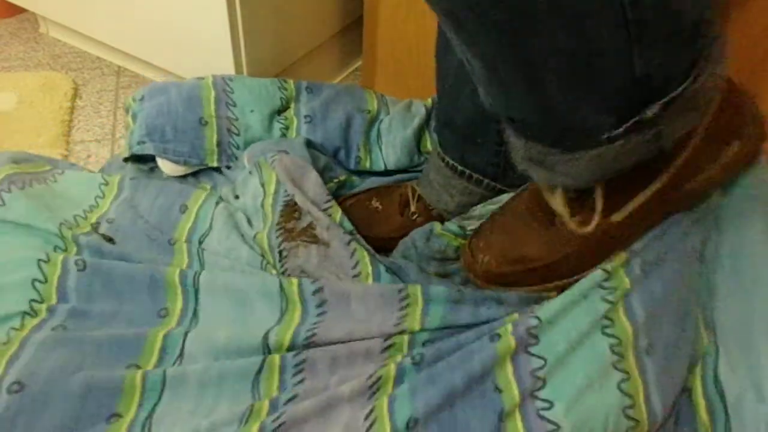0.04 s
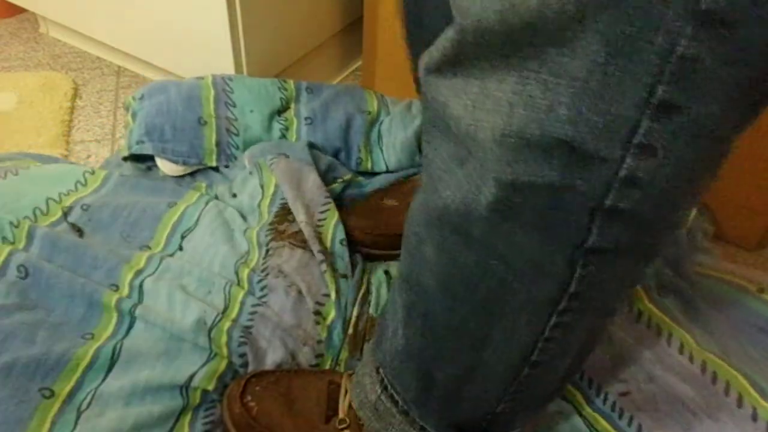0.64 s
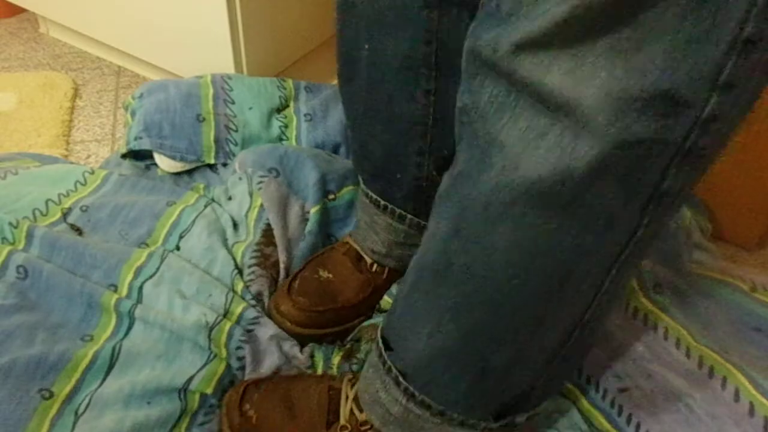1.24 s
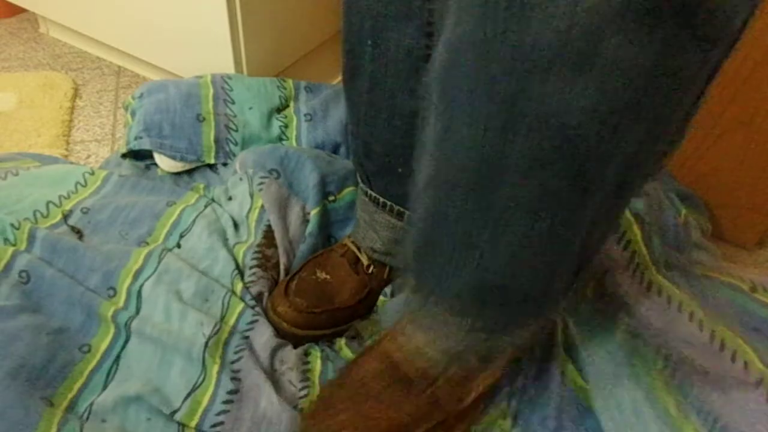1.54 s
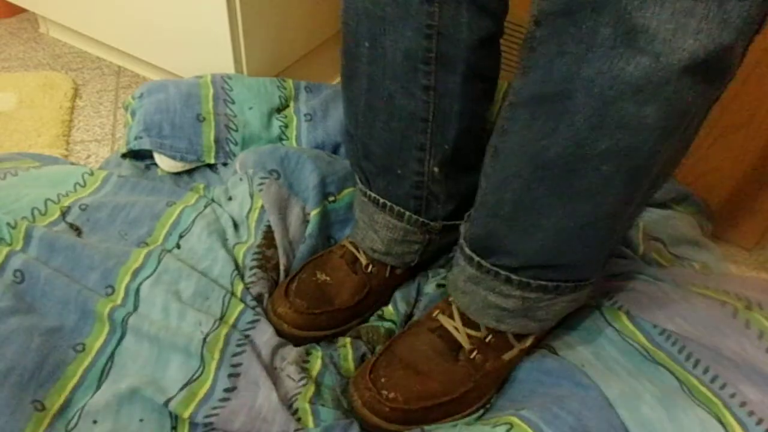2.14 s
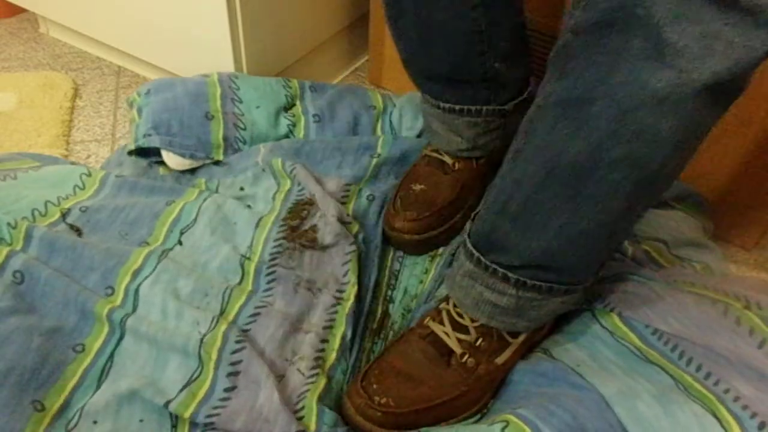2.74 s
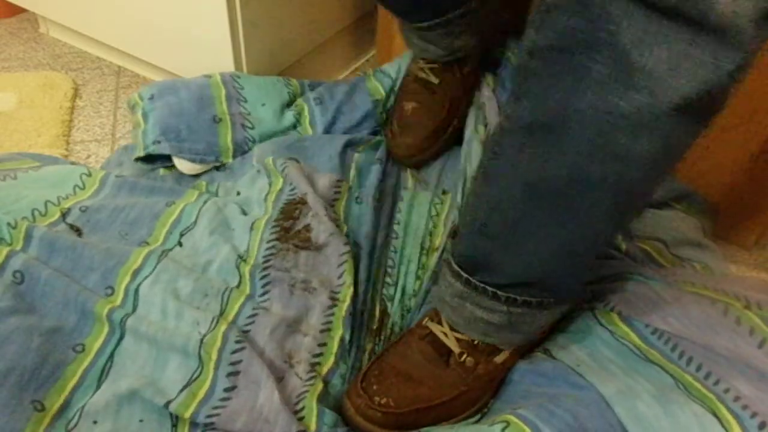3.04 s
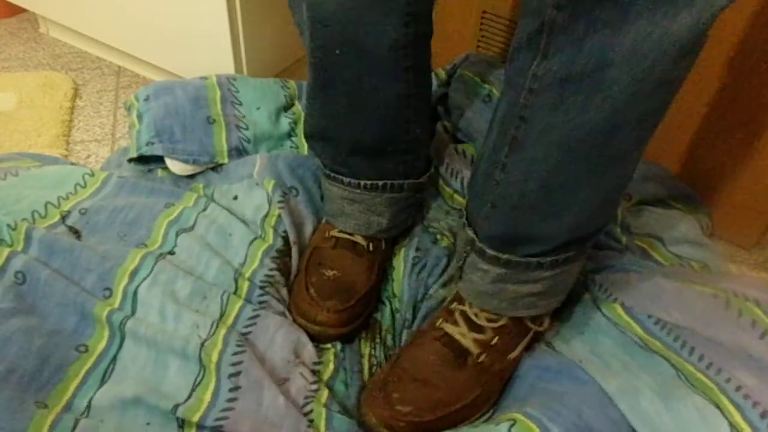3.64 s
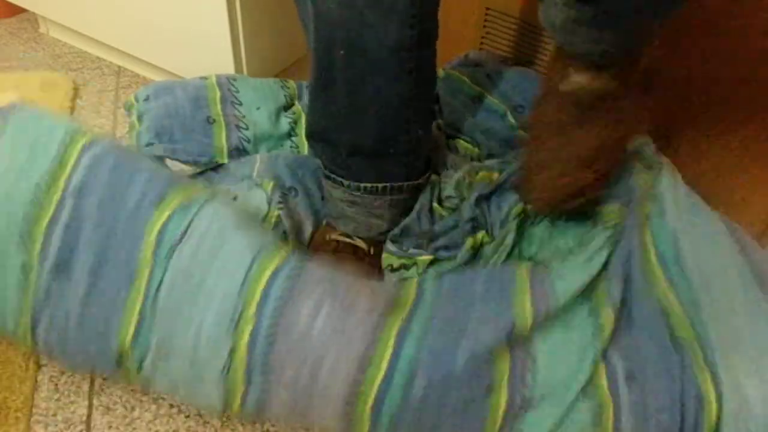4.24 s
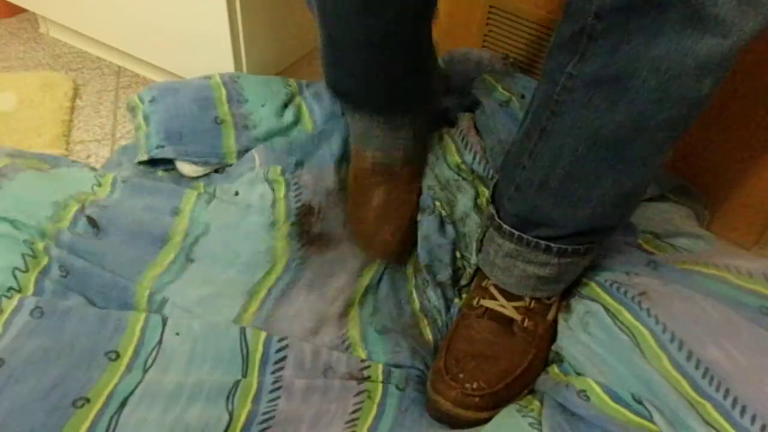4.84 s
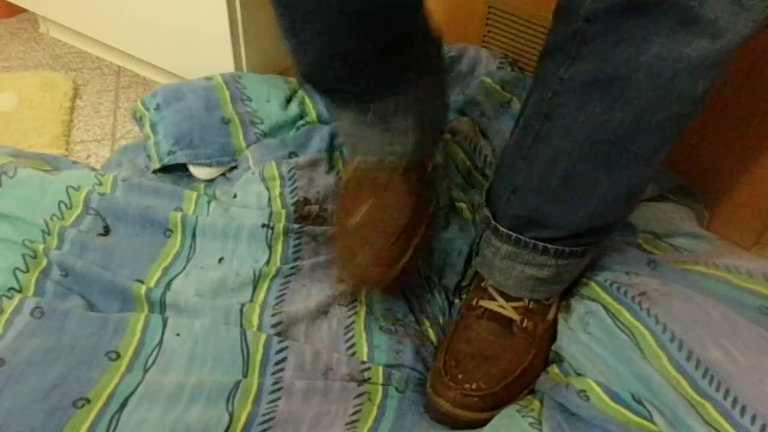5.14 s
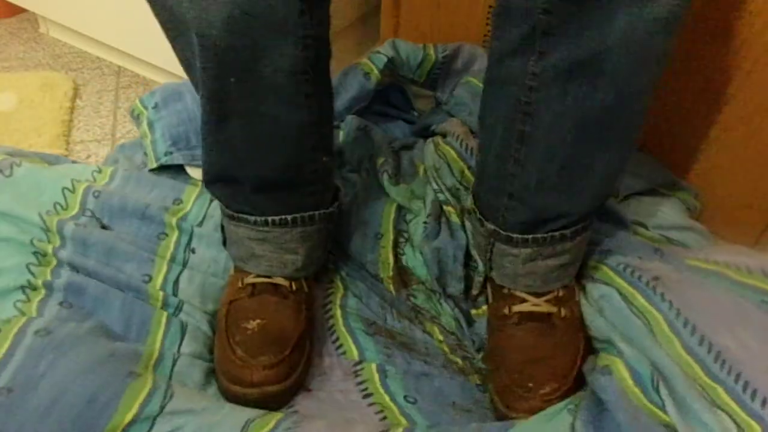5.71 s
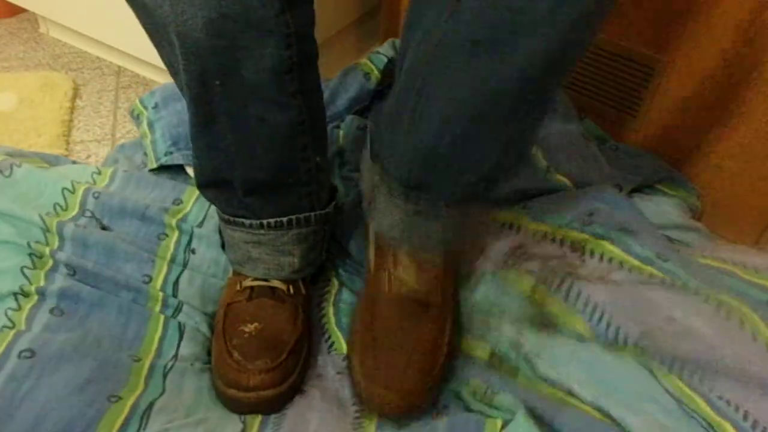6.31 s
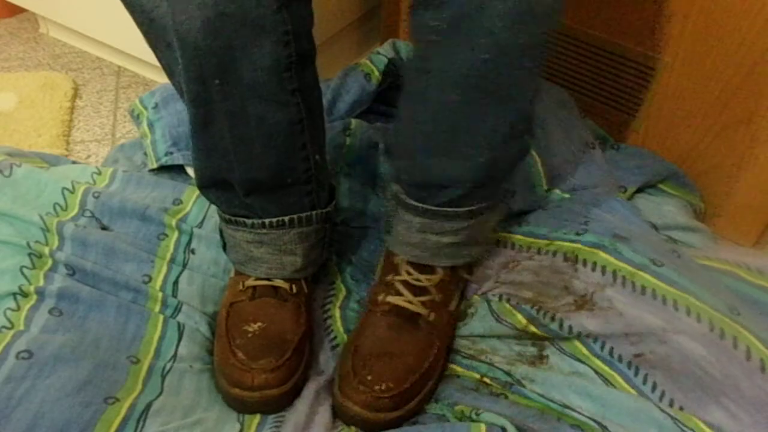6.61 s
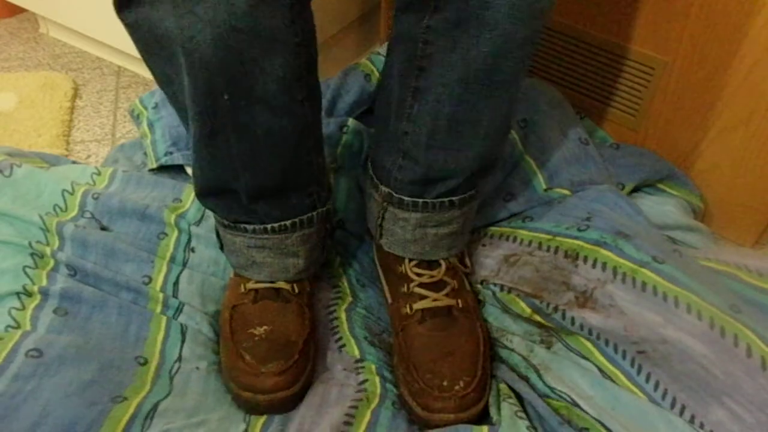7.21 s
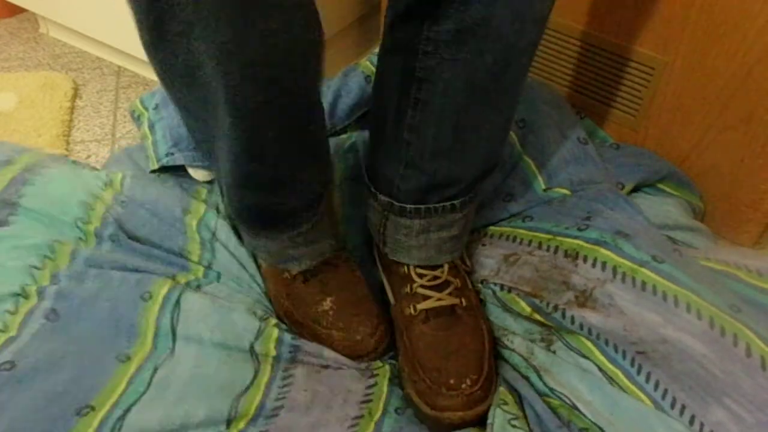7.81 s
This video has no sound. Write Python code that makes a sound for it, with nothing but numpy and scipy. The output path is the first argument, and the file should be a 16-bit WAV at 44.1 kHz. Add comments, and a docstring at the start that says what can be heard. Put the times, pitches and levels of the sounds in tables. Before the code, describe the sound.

A fan hums low and steady in a small room while heavy boots shuffle close by on a bedcover lying on the floor. Cloth swishes and scrapes from the start, with a sharp flick of a lace or fold at about 0.4 seconds and smaller ticks just after. Soft rustling continues, and the cover drags at around 2.6 seconds. A dull step at 2.9 seconds leads straight into one hard stomp at 3.1, by far the loudest sound: the sole slaps, the floor booms and thin metal rattles faintly, while the cloth skids with a short hiss. A much softer step with a faint tinkle comes at 4.4 seconds, followed by another drag at 4.8. Very light footfalls come near 5.3 and 6.4 seconds. At about 7.4 seconds a soft knock and a stronger swishing scrape are heard, then light steps and crisp flicks around 7.7.

```python
"""Heavy boots shuffle on a bedcover in a small room, land softly a few times and stomp once, hard.
Each sole rolls down from heel to toe, knocks, slaps and sets the floor's modes ringing; the stomp
makes the floor boom and thin metal rattle faintly. Slipping threads hiss, the cover scrapes over
the floor, laces and folds flick now and then. A fan hums behind it all."""
import sys
import numpy as np
from scipy import signal
from scipy.fft import rfft, irfft
from scipy.io import wavfile

SR = 44100
rng = np.random.default_rng(int(sys.argv[2]) if len(sys.argv) > 2 else 0)


def store_pcm(level_fs):
    """Save levels as 16-bit WAV."""
    pcm = np.round(np.clip(level_fs, -1, 1) * 32767).astype(np.int16)
    wavfile.write(sys.argv[1], SR, np.atleast_2d(pcm).T)


N = 355446
TIME, FREQS = np.arange(N) / SR, np.fft.rfftfreq(N, 1 / SR)

# leg swings dragging the cover: (peak time [s], cloth hiss [dB], floor scrape [dB], swell [s], fade [s])
LEG_MOVES = [(.04, -58.5, -72, 0.08, 0.18), (.21, -47.5, -45, 0.024, .07), (.68, -56, -65, 0.12, 0.1),
             (1.03, -53.5, -66, 0.039, 0.053), (1.41, -50, -56.5, 0.075, 0.15),
             (1.83, -55.5, -66, 0.045, 0.074), (2.571, -47, -45, 0.068, 0.061),
             (2.93, -51, -43, 0.066, 0.18), (3.83, -48.5, -53.5, 0.13, 0.19),
             (4.42, -52, -50, 0.081, 0.071), (4.78, -45, -46.5, 0.059, 0.054), (5.08, -58, -68, 0.085, .06),
             (5.33, -54.5, -51, 0.063, 0.078), (5.58, -55.5, -65, 0.076, 0.089),
             (5.97, -55.5, -60, 0.093, 0.16), (6.38, -57, -64, 0.096, 0.14), (6.81, -60, -75, 0.11, 0.076),
             (7.28, -52, -67, 0.069, 0.058), (7.44, -40.5, -39.5, 0.043, 0.057),
             (7.73, -51, -49.5, 0.048, 0.051), (7.92, -55, -50.5, 0.035, .03)]


def amp(db):
    """Decibels to gain."""
    return 10 ** (np.asarray(db) / 20)


def unit_rms(x):
    """Scale to an rms of one."""
    return x / np.sqrt(np.mean(x ** 2) + 1e-20)


def curve_at(points, hz):
    """Interpolate on a log-frequency axis."""
    point_hz, value = np.transpose(points)
    return np.interp(np.log(hz + 1), np.log(point_hz + 1), value)


def add(mix, start_s, sound):
    """Mix a sound in at a time."""
    part = mix[max(round(start_s * SR), 0):][:len(sound)]
    part += sound[:len(part)]


def colour(x, spectrum, size=4096):
    """Minimum-phase filter; white noise keeps its power."""
    gain = unit_rms(amp(curve_at(spectrum, abs(np.fft.fftfreq(size, 1 / SR)))))
    log_response = np.conj(signal.hilbert(np.log(gain)))
    taps = np.fft.ifft(np.exp(log_response)).real
    return signal.oaconvolve(x, taps[:size // 2])[:len(x)]


def shaped_noise(gain, n=N):
    """Unit-rms noise, weighted per frequency bin."""
    return unit_rms(irfft(rfft(rng.standard_normal(n)) * gain, n))


def resonance(hz, half_width_hz):
    """Noise-driven resonance, unit rms."""
    return shaped_noise(1 / (1 + ((FREQS - hz) / half_width_hz) ** 2))


def mode(hz, db, t60_s, t):
    """Decaying sine of a struck body."""
    return amp(db - 60 * t / t60_s) * np.sin(2 * np.pi * hz * t)


def snap(centre_hz, t60_s, width_oct, rise_s):
    """Short noise burst in one band."""
    t = TIME[:SR // 4]
    hz = np.fft.rfftfreq(len(t), 1 / SR) + 1
    band = 1 / (1 + (np.log2(hz / centre_hz) / width_oct) ** 2 / 2) ** 2
    envelope = np.minimum(t / rise_s, 1) * amp(-60 * np.maximum(t - rise_s, 0) / t60_s)
    return envelope * shaped_noise(band, len(t))


def fibres(grain_db, clump_db, clump_hz):
    """Countless tiny thread slips, uneven in size, optionally clumped; unit rms."""
    slips = rng.standard_normal(N)
    sizes = np.minimum(rng.exponential(1, N), 5)
    clumps = shaped_noise(np.exp(-(FREQS / clump_hz) ** 2))
    return unit_rms(slips * amp(grain_db * sizes + clump_db * clumps))


def effort(peak_s, swell_s, fade_s, roundness=1.4):
    """Power of one leg move: swells to its peak, then fades."""
    width_s = np.where(TIME < peak_s, swell_s, fade_s)
    return np.exp(-abs((TIME - peak_s) / width_s) ** roundness)


def contacts():
    """Every touch of boot on floor: (time [s], weight [dB], knock [dB], slap [dB])."""
    # (time [s], heel-to-toe roll [s], weight on floor [dB], dull knock [dB], hard slap [dB])
    landings = [(2.9423, 0.047, -30, -32, -38.5), (3.0181, 0.015, -28.5, -64, -64),
                (3.0802, 0.027, -11, -14, -14), (4.412, 0.035, -45.5, -40.5, -43.5),
                (5.282, 0.0041, -62, -72, -58), (6.351, .022, -66, -51.5, -68),
                (7.353, 0.093, -62, -43, -58), (7.69, 0.0038, -67, -58, -53),
                (7.775, 0.00405, -55, -46.5, -61)]
    # heel, flat sole, ball, toe, settling: (delay [roll lengths], weight [dB], knock [dB], slap [dB])
    roll_stages = [(0, -3.5, -0.5, -4.5), (.372, -1, -0.5, -0.5), (.872, -1.5, -4.5, -13.5),
                   (1, -4, -5, -15.5), (3.285, -17.5, -23, -36)]
    return [(s + delay * roll_s, weight + stage_weight, knock + stage_knock, slap + stage_slap)
            for s, roll_s, weight, knock, slap in landings
            for delay, stage_weight, stage_knock, stage_slap in roll_stages]


def room(x, size=256, build_s=0.0022):
    """Dense reflections off near walls; bass lingers longest."""
    # reverberation: (frequency [Hz], t60 [s])
    decay_times = [(60, 1), (170, 0.77), (400, 0.59), (1000, 0.38), (2800, 0.29), (7000, 0.23),
                   (16000, 0.2)]
    hz, t, noise = signal.stft(rng.standard_normal(SR), SR, nperseg=size)
    decay = amp(-60 * t / curve_at(decay_times, hz)[:, None])
    tail = signal.istft(noise * decay, SR, nperseg=size)[1]
    tail *= 1 - np.exp(-(TIME[:len(tail)] / build_s) ** 2)
    return signal.fftconvolve(x, tail / np.linalg.norm(tail))[:N]


def fan(air_db=-50.68):
    """Steady rush of air with a few wavering resonances."""
    # (frequency [Hz], relative density [dB])
    air_spectrum = [(10, -17), (20, 1), (40, -9), (65, 0), (100, -8.5), (180, -7), (225, -17.5),
                    (310, -13.5), (400, -20.5), (620, -19.5), (1090, -23.5), (1440, -34), (2500, -39.5),
                    (16000, -48)]
    # (frequency [Hz], half-width [Hz], level [dB])
    hums = [(68.5, 4.7, -58.5), (158.3, 13, -66), (566, 39, -60), (894, 93, -66)]
    air = amp(air_db) * shaped_noise(amp(curve_at(air_spectrum, FREQS)))
    return air + sum(amp(db) * resonance(hz, half_width_hz) for hz, half_width_hz, db in hums)


def floor_heave(swell_s=0.04):
    """The floor shudders as weight shifts, more felt than heard."""
    # (time [s], level [dB], frequency [Hz], t60 [s])
    heaves = [(0.222, -30.5, 10, 3.5), (0.949, -37, 17, 2.9)]
    t, out = TIME[:3 * SR], np.zeros(N)
    for s, db, hz, t60_s in heaves:
        add(out, s, mode(hz, db, t60_s, t) * (1 - np.exp(-t / swell_s)))
    return out


def cloth_swish(rest_db=-67, trim_db=-1.18):
    """Denim and bedcover hiss as the legs move, faintly at rest."""
    # (frequency [Hz], relative density [dB])
    hiss_spectrum = [(500, -15.5), (1200, 0.5), (2000, -6.5), (3500, -6), (6000, -5.5), (8000, -1),
                     (9700, 2.5), (11500, -4), (14000, -10), (16000, -14)]
    move_power = sum(amp(db) ** 2 * effort(s, swell, fade) for s, db, _, swell, fade in LEG_MOVES)
    hiss = unit_rms(colour(fibres(grain_db=2.5, clump_db=0, clump_hz=45), hiss_spectrum))
    return amp(trim_db) * np.sqrt(amp(rest_db) ** 2 + move_power) * hiss


def cover_drag():
    """The weighted cover rubs over the floor: a low, lumpy scrape."""
    # (frequency [Hz], relative density [dB])
    scrape_spectrum = [(30, -21), (70, 10.5), (110, 2.5), (200, 3.5), (400, -3.5), (600, -4.5), (830, -4.5),
                       (1250, -10.5), (1700, -23), (3000, -19.5), (6000, -37), (16000, -54)]
    power = sum(amp(db) ** 2 * effort(s, swell, fade) for s, _, db, swell, fade in LEG_MOVES)
    scrape = unit_rms(colour(fibres(grain_db=3, clump_db=1.5, clump_hz=70), scrape_spectrum))
    return np.sqrt(power) * scrape


def flicks_and_ticks(room_db=-6.5):
    """Laces and taut folds flick, leather and soles tick, small metal parts tinkle."""
    # bright, wide band: (time [s], level [dB], centre [Hz], t60 [s])
    flicks = [(0.313, -46, 12000, .012), (0.3556, -21, 7100, .037), (.53, -37.5, 6040, 0.022),
              (.538, -37.5, 8700, .042), (1.016, -39, 6700, 0.027), (1.117, -53, 3500, .02),
              (1.381, -44, 9000, .012), (3.079, -20.5, 3980, .01), (3.444, -50.5, 7800, 0.019),
              (4.42, -51, 3320, .12), (5.28, -45.5, 7100, .01), (7.68, -41, 9600, .08),
              (7.69, -31.5, 10600, 0.017), (7.7735, -35.5, 10470, 0.024), (7.868, -40, 8900, 0.016)]
    # dull, narrower band: (time [s], level [dB], centre [Hz], t60 [s])
    ticks = [(0.4562, -30, 2140, 0.011), (.467, -46, 2150, .02), (2.18, -65, 1190, .011),
             (4.412, -49, 1670, 0.27), (6.351, -45, 1150, 0.0099), (7.352, -43, 1020, 0.036),
             (7.406, -47.5, 970, 0.32), (7.682, -51, 1234, 0.12), (7.773, -45, 1280, 0.028)]
    # faint metal rings: (time [s], level [dB], centre [Hz], width [oct])
    tinkles = [(3.222, -44, 4900, .005), (3.585, -53, 2870, 0.41), (4.41, -49.5, 8200, 0.26),
               (4.645, -59, 3650, 0.34), (5.01, -73, 3700, 0.053), (5.41, -70, 3700, .06),
               (5.835, -66, 3700, .05)]
    # ring common to all three: (frequency [Hz], relative gain [dB])
    ring_spectrum = [(1000, 1.5), (3000, -8.5), (3800, -3.5), (4400, -4), (5200, -5.5), (6400, -6),
                     (7400, -7), (8270, 1.5), (8800, -8), (9400, 2.5), (10500, -4.5), (13000, -5),
                     (16000, -11.5)]
    bursts = np.zeros(N)
    for s, db, hz, t60_s in flicks:
        add(bursts, s, amp(db) * snap(hz, t60_s, width_oct=1.0, rise_s=0.0024))
    for s, db, hz, t60_s in ticks:
        add(bursts, s, amp(db) * snap(hz, t60_s, width_oct=0.79, rise_s=0.00022))
    for s, db, hz, width_oct in tinkles:
        add(bursts, s, amp(db) * snap(hz, t60_s=0.3, width_oct=width_oct, rise_s=0.0083))
    direct = colour(bursts, ring_spectrum)
    return direct + amp(room_db) * room(direct)


def cloth_skids(rise_s=0.005, release_s=0.019, room_db=-8):
    """Cloth gives way under a landing boot and slides until pinned."""
    # (time [s], level [dB], length [s], decay [dB/s])
    skids = [(2.94, -40, 0.074, 176), (3.065, -30, .24, 42), (3.295, -48, 0.196, 98),
             (4.399, -56, 0.063, 40)]
    # (frequency [Hz], relative density [dB])
    skid_spectrum = [(500, -4), (1500, -6), (2900, -5.5), (4200, -2.5), (5200, -3.5), (6700, -3), (7700, 0),
                     (8600, 3), (10000, -1), (12000, -9), (16000, -22)]
    push = np.zeros(N)
    for s, db, length_s, decay_db_per_s in skids:
        t = TIME[:int(length_s * SR)]
        gate = np.minimum(t / rise_s, 1) * np.minimum((length_s - t) / release_s, 1)
        add(push, s, amp(db - decay_db_per_s * t) * gate)
    direct = colour(push * fibres(grain_db=2, clump_db=1.2, clump_hz=120), skid_spectrum)
    return direct + amp(room_db) * room(direct)


def metal_rattle(rise_s=0.0044, threshold_db=-36):
    """Only a hard slap shakes thin metal loose; chattering edges keep its ring rough."""
    # (frequency [Hz], half-width [Hz], level [dB], t60 [s])
    metal_modes = [(1720, 130, -14, 0.24), (2270, 35, -14, 0.25), (2410, 170, -13, 0.27),
                   (2850, 110, -9.5, 0.18), (3100, 56, -27, 0.67), (2870, 980, -28.5, 1)]
    t, out = TIME[:SR], np.zeros(N)
    for hz, half_width_hz, db, t60_s in metal_modes:
        envelope = amp(db - 60 * t / t60_s) * (1 - np.exp(-t / rise_s))
        power = np.zeros(N)
        for s, _, _, slap_db in contacts():
            excess = max(amp(slap_db) - amp(threshold_db), 0)
            add(power, s, (excess * envelope) ** 2)
        out += np.sqrt(power) * resonance(hz, half_width_hz)
    return out


def soles(knock_t60_s=0.074, slap_t60_s=0.028, slap_boost_db=3, knock_room_db=-5, slap_room_db=-2):
    """The padded sole knocks dully; a hard landing also slaps through the cloth."""
    # both: (frequency [Hz], relative density [dB])
    knock_spectrum = [(30, -26), (70, -11), (140, 5.5), (260, -5), (400, -5.5), (500, -7.5), (720, -9.5),
                      (960, -11), (1300, -8.5), (2000, -40), (5000, -41)]
    slap_spectrum = [(200, -36), (600, -13.5), (960, 3), (1300, -4.5), (1800, -11), (2250, 0), (2800, 0),
                     (3300, -7), (4500, -12.5), (6500, -37), (9000, -15), (12000, -28), (16000, -60.5)]
    t, knock, slap = TIME[:SR // 2], np.zeros(N), np.zeros(N)
    for s, _, knock_db, slap_db in contacts():
        add(knock, s, amp(knock_db - 60 * t / knock_t60_s) * rng.standard_normal(len(t)))
        add(slap, s, amp(slap_db + slap_boost_db - 60 * t / slap_t60_s) * rng.standard_normal(len(t)))
    knock, slap = colour(knock, knock_spectrum), colour(slap, slap_spectrum)
    return knock + slap + room(amp(knock_room_db) * knock + amp(slap_room_db) * slap)


def floor_boom(contact_s=0.00025, soft_cutoff_hz=380, hz_per_slap=25000):
    """Each contact rings the floor; a cushioned one reaches only the low modes."""
    # (frequency [Hz], level [dB], t60 [s])
    floor_modes = [(29.04, -12.5, 3.14), (61.4, -14, 1.08), (72, -24, 1.4), (108.4, -24.5, 1.3),
                   (120.2, -11.5, 0.52), (140.6, -14, 0.69), (156, 1, 0.454), (169.1, -13.5, .34),
                   (186, -25.5, 1.55), (208, -1, 0.107), (210.5, -19, 0.73), (228.5, -12, 0.19),
                   (232, -17, 0.1), (289, -20, 0.33), (340.6, -11, 0.23), (386, -25, 0.51),
                   (425, -11.5, .28), (530, -31, 0.19), (627, -16.5, 0.29), (718, -20, 0.36),
                   (856, -34, 0.2), (880, -20, 0.2), (986, -15, 0.27)]
    t, out = TIME[:2 * SR], np.zeros(N)
    mode_hz = np.array(floor_modes)[:, 0]
    onset = 1 - np.exp(-t / contact_s)
    rings = onset * np.array([mode(hz, db, t60_s, t) for hz, db, t60_s in floor_modes])
    for s, weight_db, _, slap_db in contacts():
        cutoff_hz = soft_cutoff_hz + hz_per_slap * amp(slap_db)
        excitation = 1 / np.sqrt(1 + (mode_hz / cutoff_hz) ** 4)
        add(out, s, -amp(weight_db) * excitation @ rings)
    return out


def scene():
    """Boots, cloth and fan, in mono."""
    boots = floor_boom() + metal_rattle() + floor_heave() + soles() + flicks_and_ticks()
    cloth = cloth_swish() + cover_drag() + cloth_skids()
    return (boots + cloth + fan())[None]


def record(dry, cutoff_hz=16000):
    """Soft clipping rounds off the stomp; a low-pass follows."""
    lowpass = signal.firwin(511, cutoff_hz, window=("kaiser", 9), fs=SR)
    return signal.oaconvolve(np.tanh(dry), lowpass[None], "same")


dry = scene()
out = record(dry)
store_pcm(out)
```